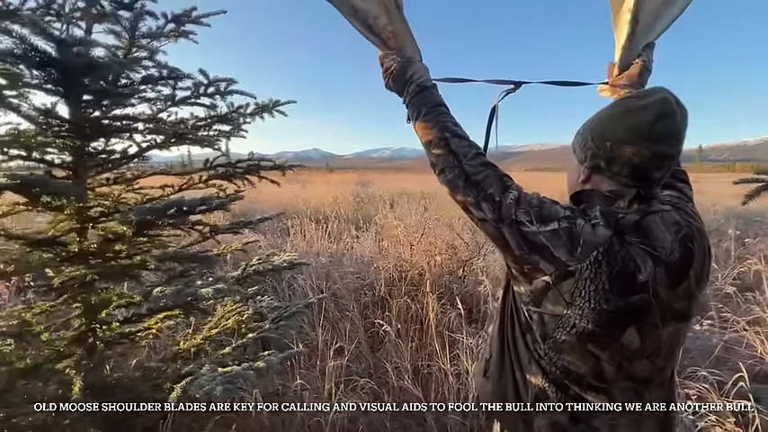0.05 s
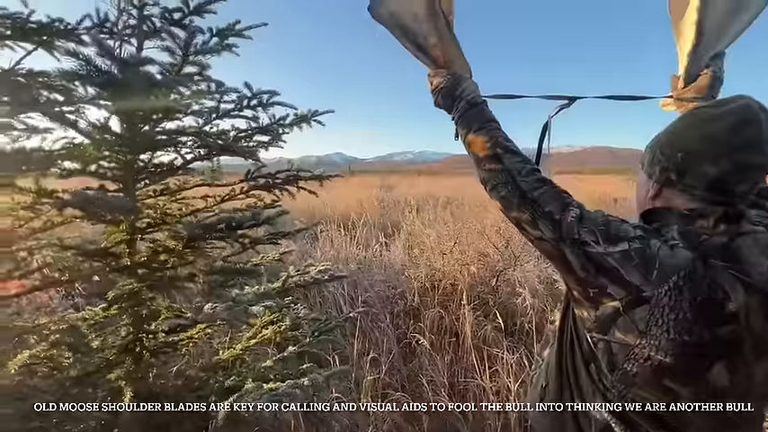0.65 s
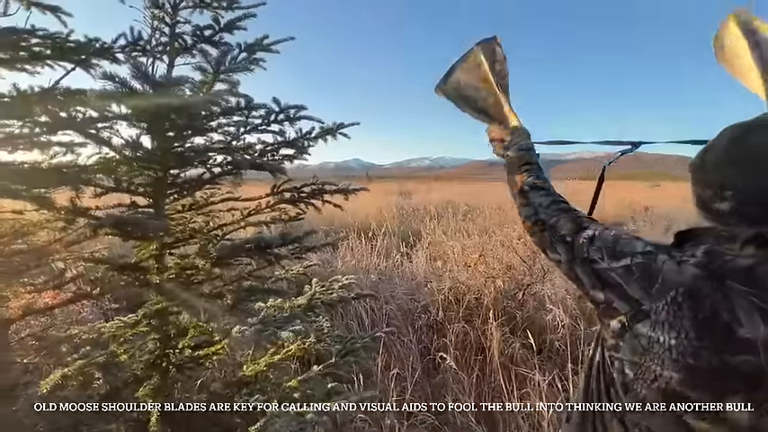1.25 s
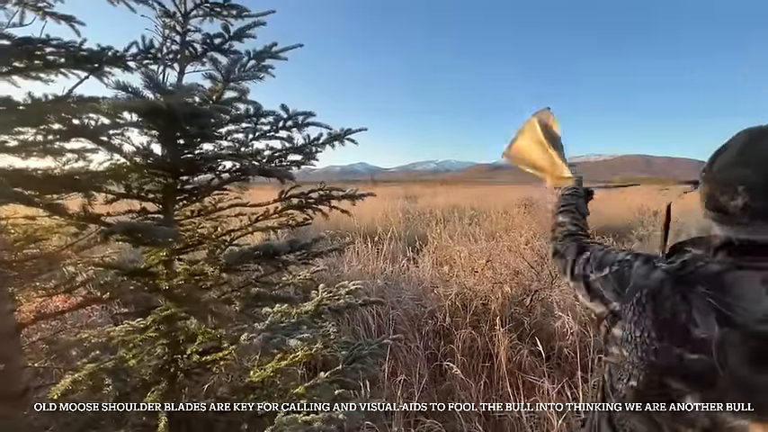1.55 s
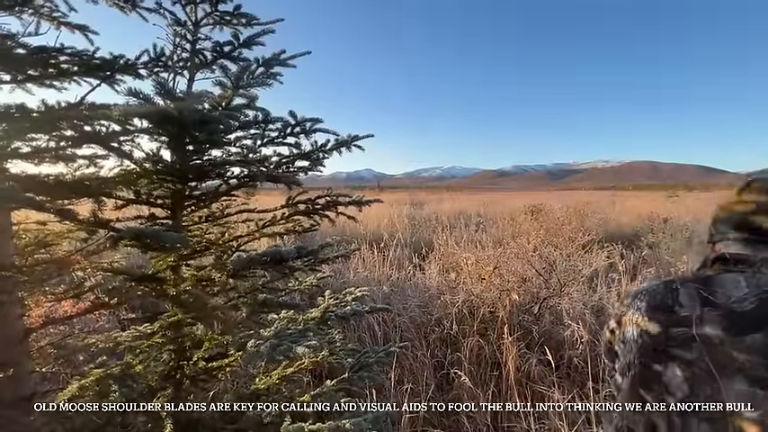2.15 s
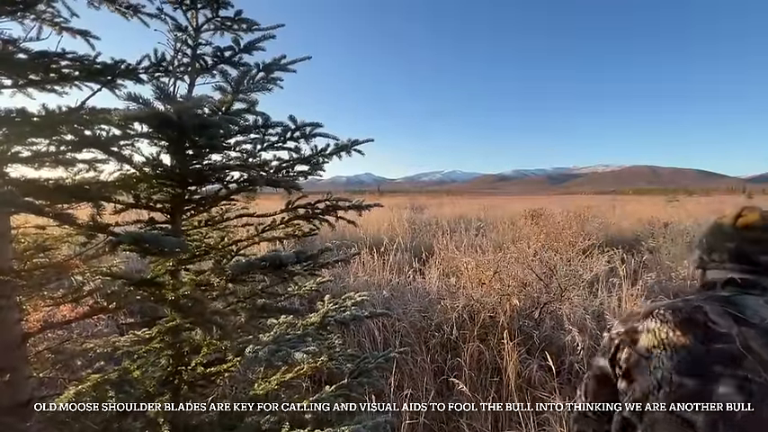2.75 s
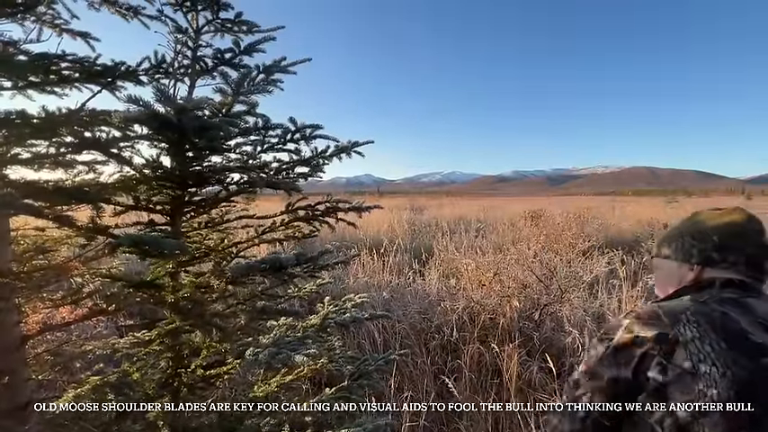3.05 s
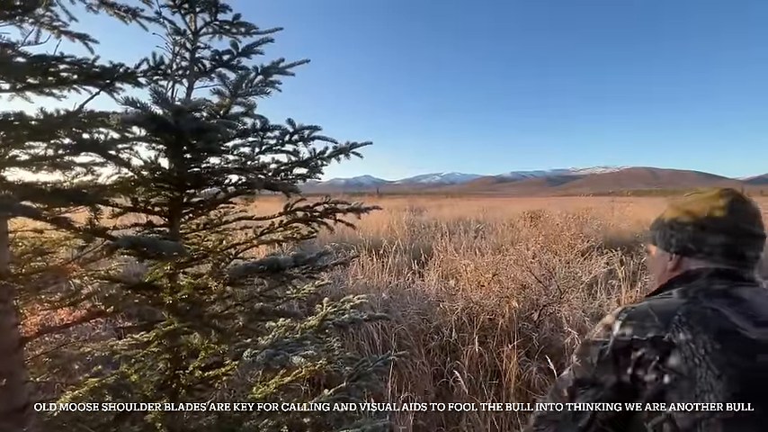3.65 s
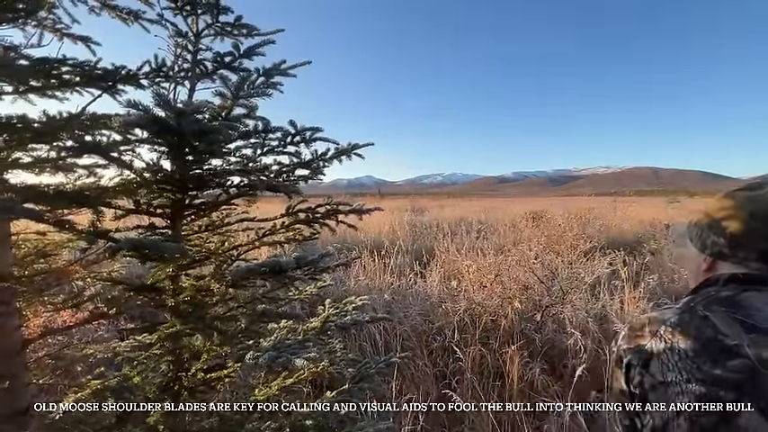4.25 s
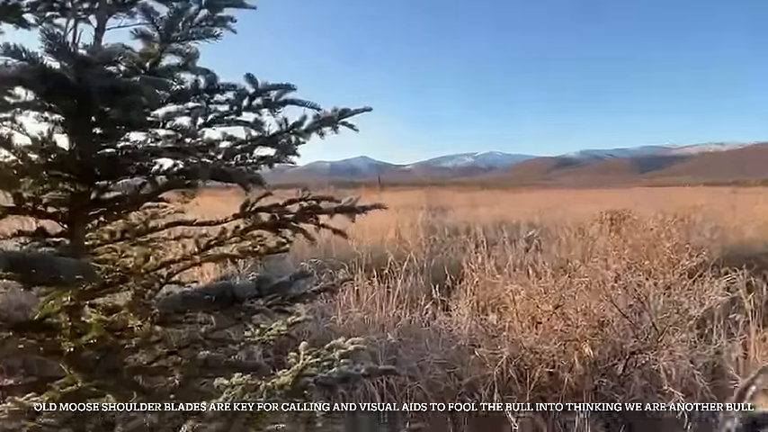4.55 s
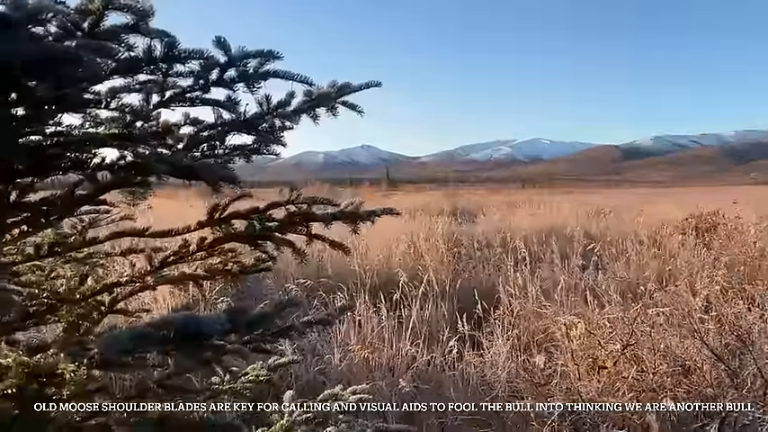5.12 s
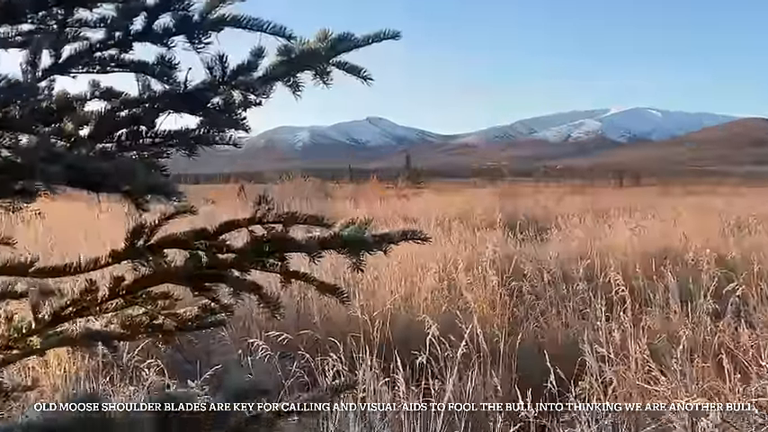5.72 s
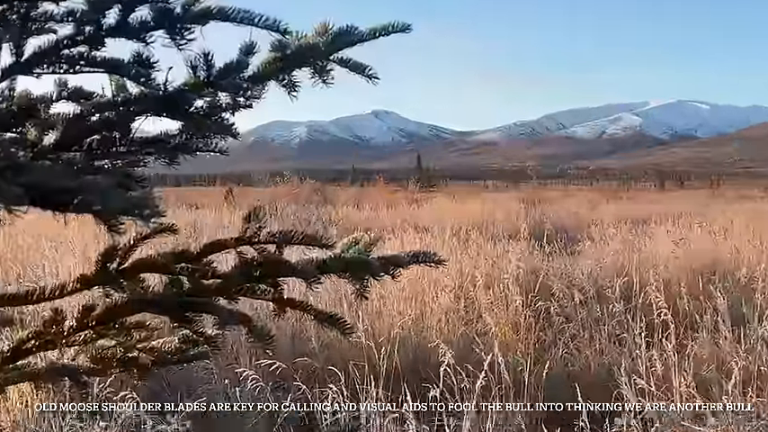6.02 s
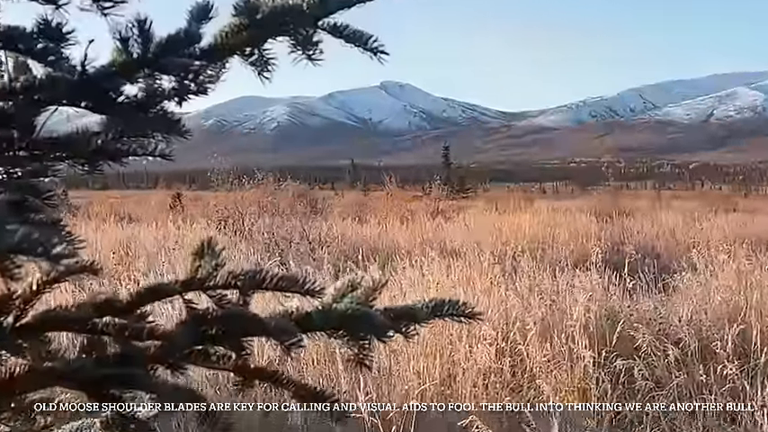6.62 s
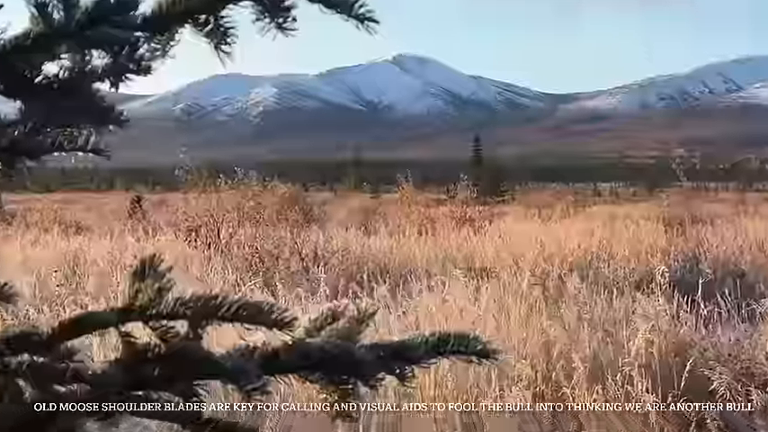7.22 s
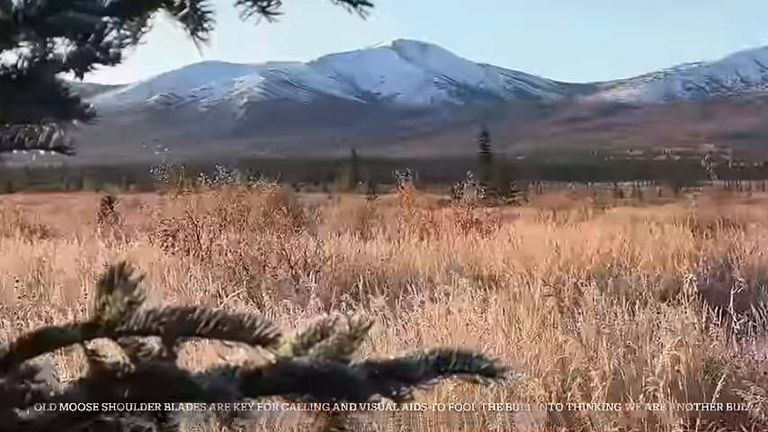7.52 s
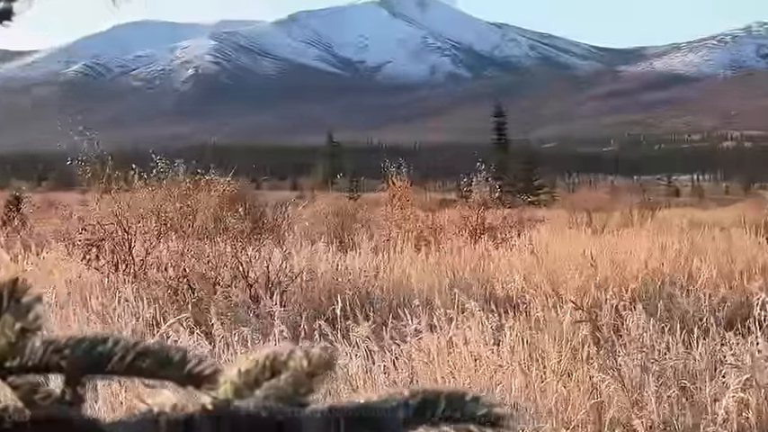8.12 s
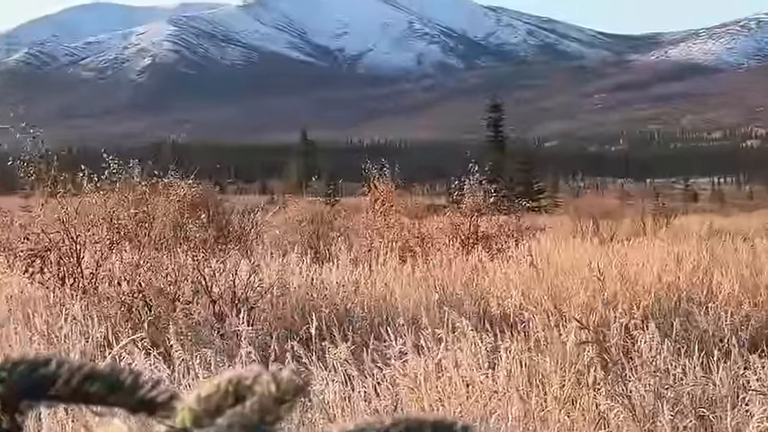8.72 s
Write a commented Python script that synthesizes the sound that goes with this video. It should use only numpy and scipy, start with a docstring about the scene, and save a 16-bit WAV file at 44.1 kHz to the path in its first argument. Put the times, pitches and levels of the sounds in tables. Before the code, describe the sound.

For the first two seconds there is only a faint open-air hiss, with a couple of light bone taps and very soft steps. At about 2.2 seconds twigs click sharply and a large dry bone rasps briefly along a branch. Around 3 seconds comes the loudest burst: dry stalks crush, bones knock hollowly and spruce needles swish. A person keeps pushing through the brush close to the microphone, with uneven crunches, twig snaps and dull, rumbling footfalls on soft ground from 3.7 to 5.4 seconds. The sound starts toward the right and moves to the centre at about 5 seconds. Two hollow knocks land near 5.6 seconds, followed by a short lull. Crackling and swishing return with a crack at 6.3 seconds and continue in surges, with a thick cluster of knocks and crunches around 8 seconds, then ease to a light rustle.

```python
"""Dry brush crushed by a walker who lowers two large dry bones and pushes past a spruce.
Stalks fail in bursts of tiny fractures; stems and twigs break, and bones tap and knock hollowly.
Needles swish, soft ground thuds and rumbles underfoot, and bone strikes and rasps along a branch.
The walker starts on the right and moves mostly ahead of the microphones, over a faint open-air hiss."""
import sys
import numpy as np
from scipy import signal
from scipy.fft import rfft, irfft, next_fast_len
from scipy.io import wavfile
from scipy.ndimage import uniform_filter1d, map_coordinates

SR = 44100
rng = np.random.default_rng(int(sys.argv[2]) if len(sys.argv) > 2 else 0)


def pcm_store(signal):
    """Save signal as 16-bit PCM."""
    levels = np.round(np.clip(np.atleast_2d(signal), -1, 1) * 32767)
    wavfile.write(sys.argv[1], SR, levels.astype(np.int16).T)


N = 391166

# weight landing on soft ground: start_s, thud_rel_db, rumble_db
FOOTFALLS = [(0.266, -52, -69), (.766, -51.5, -74), (0.89, -55, -73), (1.196, -61, -80),
             (2.389, -39.5, -48), (2.927, -52, -41), (3.51, -50, -51), (3.702, -46, -44), (4.147, -41, -43),
             (4.781, -48, -43), (4.918, -39, -44), (5.077, -43.5, -53), (5.218, -52, -54.5),
             (5.501, -47, -40), (6.305, -37.5, -37.5), (6.478, -44, -49), (7.335, -39.5, -43.5),
             (7.636, -39, -48), (8.094, -56, -49), (8.201, -48, -55), (8.364, -40, -58),
             (8.613, -52.5, -70)]
# ground rumble spectrum: freq_hz, density_db
GROUND_SPECTRUM = [(30, -16.5), (48, 4), (72, 12.5), (105, -1.5), (180, -1), (300, -48)]


def amp(db):
    """Decibels to gain."""
    return 10 ** (np.asarray(db) / 20)


def unit_rms(x):
    """Scale to rms 1."""
    return x / np.sqrt(np.mean(x ** 2) + 1e-20)


def unit_energy(x):
    """Scale each row to energy 1."""
    return x / np.sqrt(np.sum(x ** 2, axis=1, keepdims=True) + 1e-20)


def log_interp(points, hz):
    """Read (freq_hz, value) points on a log axis."""
    knots_hz, values = np.transpose(points)
    return np.interp(np.log(hz + 1), np.log(knots_hz + 1), values)


def curves(rows):
    """Per-sample curve for each column after time_s."""
    time_s, *columns = np.transpose(rows)
    return [np.interp(np.arange(N) / SR, time_s, column) for column in columns]


def wobble(rate_hz):
    """Smooth random curve, knots at rate_hz."""
    knots = rng.standard_normal(int(N * rate_hz / SR) + 4)
    return map_coordinates(knots, [np.arange(N) * rate_hz / SR])


def filtered(x, response):
    """Apply a complex frequency response."""
    size = next_fast_len(N + SR // 2)
    return irfft(rfft(x, size) * response(np.fft.rfftfreq(size, 1 / SR)), size)[..., :N]


def coloured(x, spectrum):
    """Shape by a spectrum, at rms 1."""
    return unit_rms(filtered(x, lambda hz: amp(log_interp(spectrum, hz))))


def band(x, lo_hz, hi_hz, order=2):
    """Causal band-pass."""
    edges_hz = [lo_hz, min(hi_hz, SR / 2 - 1000)]
    return signal.sosfilt(signal.butter(order, edges_hz, 'band', fs=SR, output='sos'), x)


def add(track, start_s, sound):
    """Mix in at start_s."""
    part = track[..., round(start_s * SR):][..., :sound.shape[-1]]
    part += sound[..., :part.shape[-1]]


def ringing(hz, t60_s, t):
    """Damped sines, one row per mode."""
    return np.sin(2 * np.pi * hz[:, None] * t) * amp(-60 * t / t60_s[:, None])


def struck(blows, hz, db, t60_s):
    """Blows exciting a set of modes."""
    modes = amp(db) @ ringing(hz, t60_s, np.arange(blows.shape[1]) / SR)
    return signal.fftconvolve(blows, modes[None], axes=1)[:, :blows.shape[1]]


def impulses(size, rate_hz, spread_db):
    """Random tiny breaks or contacts of uneven size; rows: direct, scattered."""
    happens = rng.random((2, size)) < rate_hz / SR
    sizes = amp(spread_db * np.clip(rng.standard_normal((2, size)), -2, 2))
    return happens * sizes * rng.choice([-1, 1], (2, size))


def burst(t, length_s, rise_s=0.00054, release_s=0.0076, settle_s=0.037, settle_db=-21):
    """Envelope of a run of impulses: rise, hold, release, weak settling tail."""
    after_s = np.maximum(t - length_s, 0)
    tail = amp(settle_db) * np.exp(-after_s / min(settle_s, 4 * length_s))
    return (1 - np.exp(-t / rise_s)) * (np.exp(-after_s / release_s) + tail)


def air():
    """Diffuse hiss of dry grass, stronger on the right."""
    # hiss envelope: time_s, level_rel_db
    levels = [(0, -63.5), (.7, -59), (1.5, -62), (5.7, -66.5), (6.1, -116)]
    # hiss spectrum: freq_hz, density_db
    spectrum = [(100, -0.5), (1400, 0.5), (1800, 6.5), (2700, -5), (5000, -1.5), (8000, -6), (11500, -34)]
    hiss = coloured(rng.standard_normal((2, N)), spectrum)
    return amp(curves(levels)[0]) * hiss * amp([[-2.5], [1.8]])


def bone_crack(blows, t60_cycles=36):
    """Blows ring the flat bone, slightly differently at each contact point."""
    # flat bone modes: freq_hz, level_db
    modes = [(1140, 5), (1270, 2), (1440, 6.5), (1830, 7.5), (2090, -10.5), (2400, -9.5), (2940, -7)]
    hz, db = np.transpose(modes)
    detune, louder = rng.standard_normal((2, len(hz)))
    ring = struck(blows, hz * np.exp(0.011 * detune), db + 2 * louder, t60_cycles / hz)
    return 0.69 * unit_energy(band(blows, 694, 2610, order=3)) + unit_energy(ring)


def knocks_and_crunches(ref_hz=520, width_ratio=1.8, dull_gain=0.53):
    """A footfall scuff, bones tapping and knocking hollowly, stems breaking: blows ring damped modes."""
    # short knocks and crunches: start_s, length_s, knock_db, pitch_hz, crack_db
    knocks = [(0.265, 0.0037, -50.5, 260, -76), (0.455, 0.0015, -40, 950, -55),
              (2.382, 0.012, -40.5, 423, -59), (2.895, 0.0041, -34, 840, -26.5),
              (2.904, 0.018, -34, 300, -37), (2.978, 0.015, -27.5, 526, -35), (3.043, 0.012, -29, 575, -27),
              (3.146, 0.014, -23, 253.5, -24.5), (3.69, 0.0083, -37.5, 451, -41),
              (3.802, 0.019, -45.5, 483, -33.5), (4.027, 0.0033, -43, 737, -53),
              (4.126, 0.0097, -29.5, 690, -41.5), (4.285, 0.044, -43, 335, -46),
              (4.444, 0.0079, -36.5, 285, -40), (4.764, 0.013, -34.5, 402, -29.5),
              (4.904, 0.011, -38, 354, -56), (5.048, .012, -40.5, 562, -49),
              (5.071, 0.0044, -35.5, 420, -37), (5.21, 0.015, -38, 778, -45),
              (5.304, 0.029, -47, 804, -41.5), (5.344, .02, -53, 880, -46), (5.5, 0.09, -38.5, 535, -61),
              (5.604, 0.0037, -25.5, 613, -68), (5.615, 0.011, -27.5, 594, -73),
              (6.288, 0.0078, -31, 492, -29), (6.503, 0.031, -39.5, 307, -56), (7.007, 0.01, -36, 308, -38),
              (7.047, 0.02, -42.5, 290, -43.5), (7.323, 0.0097, -34, 323, -36),
              (7.619, 0.01, -40, 460, -36.5), (7.668, 0.0068, -43, 590, -49),
              (7.847, 0.0051, -27.5, 298, -48), (7.88, 0.01, -37.5, 292, -56),
              (7.987, 0.021, -37, 576, -43), (8.029, 0.019, -33.5, 680, -54),
              (8.078, 0.015, -28, 375, -29.5), (8.17, 0.0071, -30, 438, -37.5),
              (8.345, 0.01, -38.5, 549, -38.5)]
    # knock modes: pitch_ratio, level_db, t60_s (for a knock at ref_hz)
    modes = [(1.002, 2, 0.083), (1.378, 3.5, 0.039), (1.88, 0.5, 0.025), (2.94, -6.5, 0.068)]
    out, t = np.zeros((2, N)), np.arange(SR // 5) / SR
    ratio, mode_db, t60_s = np.transpose(modes)
    for start_s, length_s, knock_db, pitch_hz, crack_db in knocks:
        blows = burst(t, length_s) * impulses(len(t), rate_hz=2200, spread_db=3)
        blows[0, round(length_s * SR / 2)] += 3  # main blow mid-run
        dull_hz = np.sqrt(pitch_hz * ref_hz)
        dull = band(blows, dull_hz / width_ratio, dull_hz * width_ratio)
        ring = struck(blows, pitch_hz * ratio, mode_db, t60_s * ref_hz / dull_hz)
        knock = dull_gain * unit_energy(dull) + unit_energy(ring)
        for part, db in (knock, knock_db), (bone_crack(blows), crack_db):
            add(out, start_s, amp(db) * unit_energy(part) * np.sqrt(length_s * SR))
    return out


def thuds(start_hz=210, end_hz=80, sink_s=0.0093, rise_s=0.0018, t60_s=0.1, scuff_db=-4):
    """Soft ground yields: a dull scuff and a falling thud, detuned per step."""
    out, t = np.zeros((2, N)), np.arange(SR // 4) / SR
    envelope = amp(-60 * t / t60_s) * (1 - np.exp(-t / rise_s))
    sinking = np.exp(-t / sink_s)
    for (start_s, db, _), detune in zip(FOOTFALLS, rng.standard_normal(len(FOOTFALLS))):
        hz = (end_hz + (start_hz - end_hz) * sinking) * np.exp(0.19 * detune)
        tone = np.sin(2 * np.pi * np.cumsum(hz) / SR)
        scuff = unit_rms(band(rng.standard_normal(len(t)), 130, 600)) * sinking
        add(out[0], start_s, amp(db + 3.5) * envelope * (tone + amp(scuff_db) * scuff))
    return out


def rumble(rise_s=0.015, hold_s=0.011, fall_s=0.078):
    """The ground shakes briefly after each thud."""
    strength, t = np.zeros(N), np.arange(SR // 2) / SR
    shake = (1 - np.exp(-t / rise_s)) * np.exp(-np.maximum(t - hold_s, 0) / fall_s)
    for start_s, _, rumble_db in FOOTFALLS:
        add(strength, start_s, amp(rumble_db) * shake)
    return strength * coloured(rng.standard_normal((2, N)), GROUND_SPECTRUM)


def bright_clicks(length_s=0.0073, low_hz=1400, split_hz=4200, top_hz=10200):
    """Thin twigs snapping and bone striking a branch: millisecond bursts with no ring."""
    # sharp bright clicks: start_s, treble_db, crack_db
    clicks = [(0.372, -70, -61), (2.215, -36, -36.5), (2.233, -33.5, -34), (2.458, -30.5, -36),
              (2.621, -69, -40.5), (3.088, -38.5, -30.5), (3.211, -46, -36.5), (3.411, -41, -49),
              (3.573, -58, -48), (3.677, -35.5, -37.5), (3.788, -43.5, -37.5), (4.945, -42, -39),
              (5.197, -36.5, -32), (5.39, -39, -43.5), (5.412, -45.5, -60), (6.196, -62, -58.5),
              (6.479, -40.5, -58), (6.533, -41, -40), (7.365, -49, -42), (7.383, -47, -43.5),
              (7.529, -61, -45), (7.991, -43, -55), (8.083, -36, -46), (8.525, -65, -55.5),
              (8.562, -70, -61)]
    out, t = np.zeros((2, N)), np.arange(SR // 8) / SR
    envelope = burst(t, length_s, rise_s=0.001, release_s=0.0055, settle_s=0.02, settle_db=-15)
    for start_s, treble_db, crack_db in clicks:
        blows = envelope * impulses(len(t), rate_hz=3500, spread_db=4)
        treble = band(blows, split_hz, top_hz, order=3)
        crack = band(blows, low_hz, split_hz)
        for part, db in (treble, treble_db), (crack, crack_db):
            add(out, start_s, amp(db) * unit_energy(part) * np.sqrt(length_s * SR))
    return out


def push_levels_db(edge_db=12, roundness=1.85):
    """Stalk and twig levels: pushes swell and fade over a light rustle."""
    # rustle of walking: time_s, stalk_rel_db, twig_rel_db
    rustle = [(1.7, -93, -96.5), (2.1, -89, -58), (3.0, -84, -46.5), (4.0, -73, -48.5), (4.65, -57, -60.5),
              (5.7, -58.5, -59.5), (5.96, -63, -70), (6.12, -65, -99), (6.9, -58, -55.5),
              (8.26, -59.5, -65), (8.86, -72, -71)]
    # pushes through brush: peak_s, rise_s, fall_s, stalk_rel_db, twig_rel_db
    pushes = [(2.54, 0.36, 0.25, -51.5, -69), (2.974, 0.088, 0.25, -35.5, -38.5),
              (3.11, 0.081, 0.14, -45.5, -32.5), (3.388, 0.12, 0.2, -60, -36),
              (3.68, 0.061, 0.087, -43, -43), (4.05, 0.043, 0.069, -75, -47.5),
              (4.381, 0.19, 0.15, -41.5, -45.5), (4.75, 0.043, 0.047, -45, -42.5),
              (4.95, 0.2, 0.24, -49.5, -51), (5.522, 0.095, 0.1, -48.5, -57),
              (6.279, 0.059, 0.35, -50.5, -47), (6.521, 0.2, 0.07, -51, -51.5),
              (6.682, 0.32, 0.092, -68, -40.5), (6.842, 0.071, 0.07, -54.5, -46),
              (7.18, 0.25, 0.09, -56.5, -57.5), (7.379, 0.11, 0.079, -45, -43.5),
              (7.81, 0.2, 0.073, -45.5, -49.5), (8.048, 0.073, 0.12, -38.5, -46),
              (8.35, 0.022, 0.029, -46, -48.5), (8.541, 0.083, 0.072, -55, -61.5),
              (8.8, 0.069, 0.066, -72, -60)]
    t = np.arange(N) / SR
    power = amp(curves(rustle)) ** 2
    for peak_s, rise_s, fall_s, stalk_db, twig_db in pushes:
        near = np.abs(t - peak_s) < 1
        away = np.maximum((peak_s - t[near]) / rise_s, (t[near] - peak_s) / fall_s)
        swell = amp(-edge_db * away ** roundness)
        power[:, near] += (amp([[stalk_db], [twig_db]]) * swell) ** 2
    return 10 * np.log10(power)


def stalk_flicks(rate_hz=260, t60_at_1khz_s=0.03, spread_db=8):
    """Stalks flick past one another, each ringing at its own pitch."""
    t = np.arange(SR // 25) / SR
    when, pitch, size, side = rng.random((int(rate_hz * N / SR), 4)).T
    hz = 220 * 2 ** (4 * pitch)
    gain = hz ** 1.2 * amp(spread_db * size)
    grains = ringing(hz, t60_at_1khz_s * np.sqrt(1000 / hz), t) * gain[:, None]
    at = ((when * N).astype(int)[:, None] + np.arange(len(t))).ravel()
    direct = np.bincount(at, grains.ravel(), N)[:N]
    scattered = np.bincount(at, (grains * np.sign(side - .5)[:, None]).ravel(), N)[:N]
    return unit_rms(np.array([direct, scattered]))


def load_shifts(x, depth_db=6):
    """Narrow resonances come and go as successive stalks take the load."""
    spectra = signal.stft(x, nperseg=1024)[2]
    field = uniform_filter1d(rng.standard_normal(spectra.shape[1:]), size=2, axis=0)
    field = uniform_filter1d(field, size=6, axis=1)
    gain = amp(depth_db * np.clip(unit_rms(field), -2, 2))
    return unit_rms(signal.istft(spectra * gain)[1][:, :N])


def push_rumble(stalk_db, firm_push_db=-45.5, ground_db=-56.5, lag_s=0.051, smooth_s=0.082):
    """Ground rumble trails the load on the stalks."""
    t = np.arange(N) / SR
    load_db = np.interp(t - lag_s, t, uniform_filter1d(stalk_db, round(smooth_s * SR))) - firm_push_db
    return amp(ground_db + 0.96 * load_db) * coloured(rng.standard_normal((2, N)), GROUND_SPECTRUM)


def brush():
    """Stalks crush in clumps, fine twigs swish and tick, the ground rumbles."""
    # crushed stalk spectrum: freq_hz, density_db
    stalk_spectrum = [(90, -21), (170, -1), (335, 4.5), (430, -5), (530, 0), (680, 0.5), (1050, -2.5),
                      (1400, -6.5), (1810, -8.5), (2800, -13.5), (4000, -22.5), (8000, -69.5)]
    # swishing twig spectrum: freq_hz, density_db
    twig_spectrum = [(1200, -1), (2600, 3), (4200, -1), (5800, 3), (9300, 4), (11500, -6.5), (15800, -4.5)]
    stalk_db, twig_db = push_levels_db()
    clumps = wobble(110)
    force = np.clip((stalk_db + 68.5) / 20, 0, 1)  # 0 only rustles, 1 breaks and flicks
    crushing = unit_rms(impulses(N, rate_hz=1800, spread_db=1) * amp(5.84 * force * clumps))
    flicks = 0.55 * force * stalk_flicks()
    stalks = coloured(load_shifts(crushing + flicks), stalk_spectrum)
    flutter = amp(1.1 * clumps + 1.3 * wobble(350))
    swish = coloured(impulses(N, rate_hz=7700, spread_db=-0.5) * flutter, twig_spectrum)
    ticks = unit_rms(band(impulses(N, rate_hz=28, spread_db=2.5), 700, 3500))
    twigs = swish + amp(-16) * ticks
    return push_rumble(stalk_db) + amp(stalk_db - 1.5) * stalks + amp(twig_db - 4) * twigs


def bone_rasp():
    """Bark catches rapidly on the dragged bone and excites its resonances."""
    # drag along a branch: time_s, level_db
    drag = [(2.2, -100), (2.235, -30.5), (2.29, -48.5), (2.33, -35.5), (2.425, -34), (2.447, -44),
            (2.54, -100)]
    # bone resonances: centre_hz, width_hz, level_db
    resonances = [(1870, 330, -2), (2800, 200, -7), (3860, 220, -4), (4820, 340, -7.5), (5850, 120, 4.5),
                  (6950, 560, -8), (8230, 370, -2.5)]

    def response(hz):
        return sum((-1) ** k * amp(db) * 1j * hz * width_hz
                   / (centre_hz ** 2 - hz ** 2 + 1j * hz * width_hz)
                   for k, (centre_hz, width_hz, db) in enumerate(resonances))

    catches = impulses(N, rate_hz=11000, spread_db=5) * amp(2.3 * wobble(400))
    return amp(curves(drag)[0]) * unit_rms(filtered(catches, response))


def mic_pair(sound, likeness, lag_ms, fade_hz):
    """Direct and scattered rows to stereo; the left lags, mainly below fade_hz."""
    def split(hz):
        angle = np.arccos(np.clip(log_interp(likeness, hz), -1, 1)) / 2
        return np.array([np.cos(angle), np.sin(angle)])

    def delay(hz):
        lag_s = lag_ms / 1000 * np.exp(-(hz / fade_hz) ** 2)
        return np.exp(np.array([[-1j], [1j]]) * np.pi * hz * lag_s)

    direct, scattered = filtered(sound, split)
    return filtered(np.array([direct + scattered, direct - scattered]), delay)


def scene(dip_s=8.26, dip_width_s=0.011, dip_db=-21):
    """The walker moves from the right to mostly ahead; the level dips briefly near the end."""
    # branch scatter, walker aside: freq_hz, left_right_likeness
    likeness_aside = [(130, 0.97), (700, 0.81), (1800, 0.36), (4000, 0.31), (7800, 0.073), (10000, 1)]
    # branch scatter, walker ahead: freq_hz, left_right_likeness
    likeness_ahead = [(130, 0.98), (1500, 1), (7000, 1), (10000, .8)]
    # channel balance, walker aside: freq_hz, left_minus_right_db
    shade = [(80, 0.5), (280, 4), (600, -3), (1100, -6), (2400, 4), (5500, -6.5), (10000, 0)]
    walker = knocks_and_crunches() + bright_clicks() + thuds() + rumble() + brush() + bone_rasp()
    walker *= amp(dip_db * np.exp(-((np.arange(N) / SR - dip_s) / dip_width_s) ** 2))
    ahead_share = curves([(4.8, 0.025), (5.35, 0.7)])[0]
    aside = mic_pair(walker * (1 - ahead_share), likeness_aside, lag_ms=0.41, fade_hz=3280)
    aside = filtered(aside, lambda hz: amp(np.array([[.5], [-.5]]) * log_interp(shade, hz)))
    ahead = mic_pair(amp(-1.01) * ahead_share * walker, likeness_ahead, lag_ms=0.049, fade_hz=1540)
    return aside + ahead + air()


def record(dry, widen_from_hz=8740, turn_span_hz=3520, low_cut_hz=43, top_hz=15900):
    """Opposed channel phases widen the top octave; deep bass and extreme treble are cut."""
    def widen(hz):
        turns = np.maximum(hz - widen_from_hz, 0) / turn_span_hz
        return np.exp(np.array([[1j], [-1j]]) * np.pi * turns)

    low_cut = signal.butter(5, low_cut_hz, 'high', fs=SR, output='sos')
    wide = signal.sosfilt(low_cut, filtered(dry, widen))
    return filtered(wide, lambda hz: hz < top_hz)


dry = scene()
out = record(dry)
pcm_store(out)
```